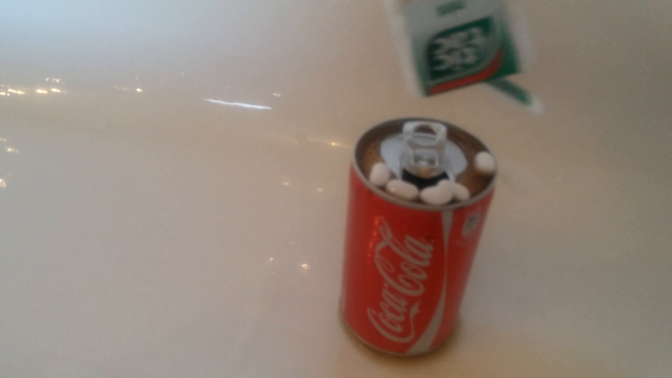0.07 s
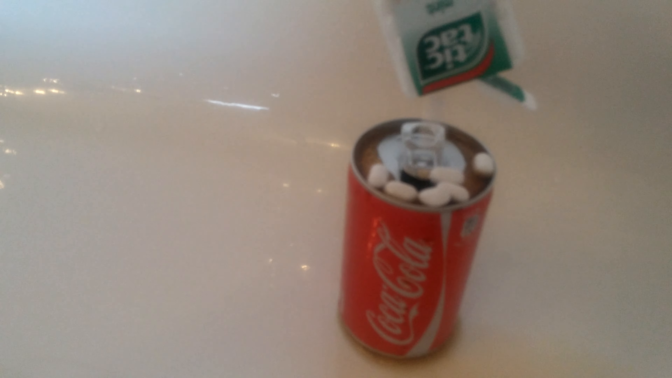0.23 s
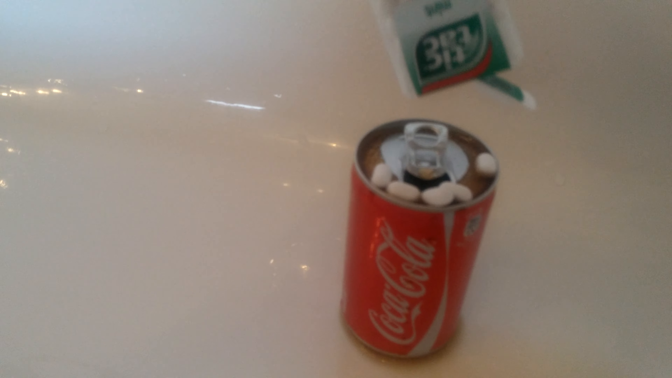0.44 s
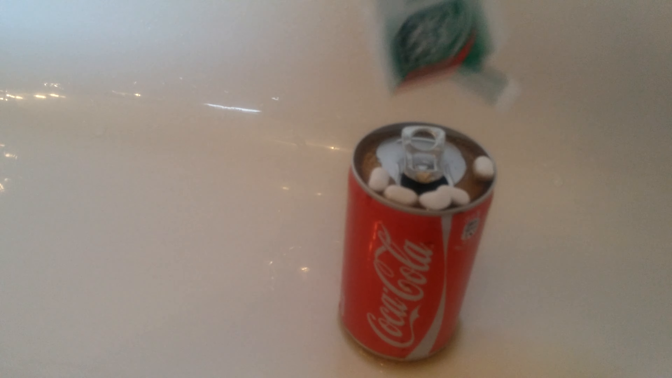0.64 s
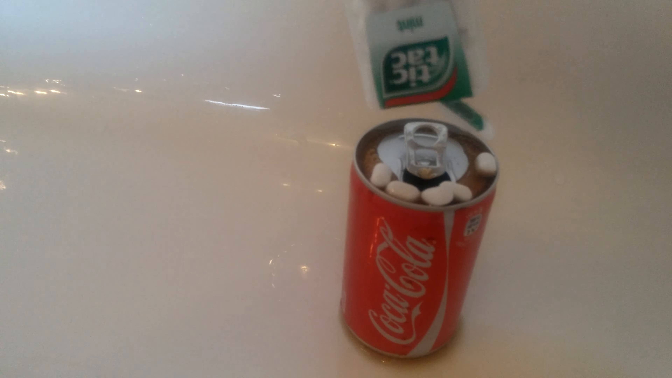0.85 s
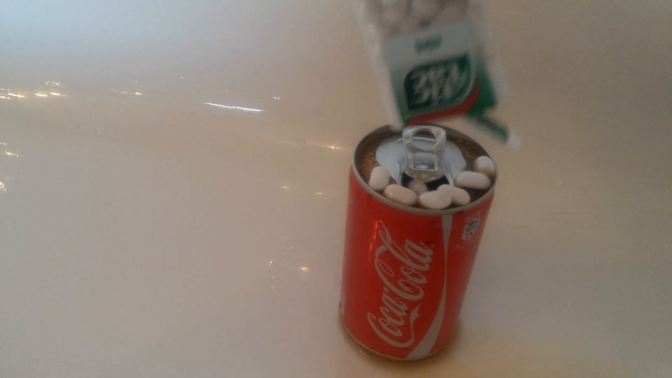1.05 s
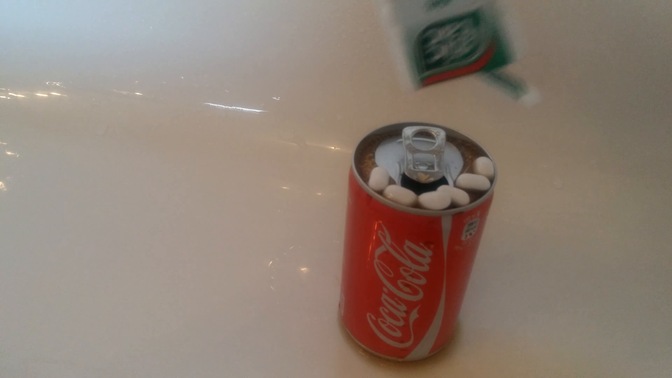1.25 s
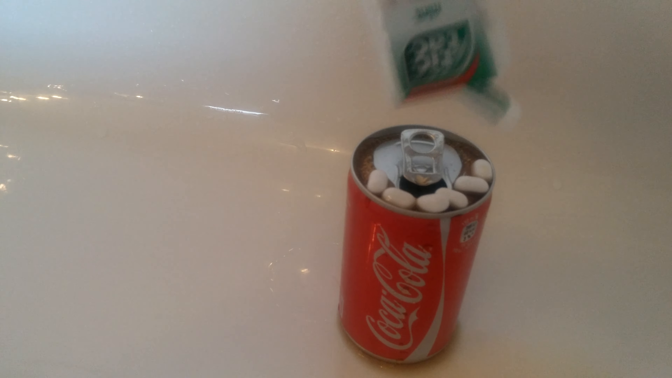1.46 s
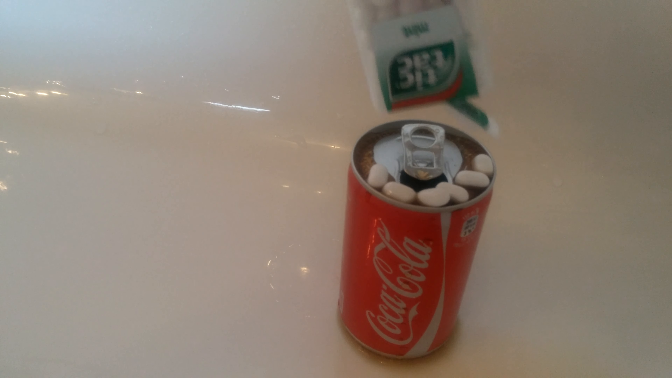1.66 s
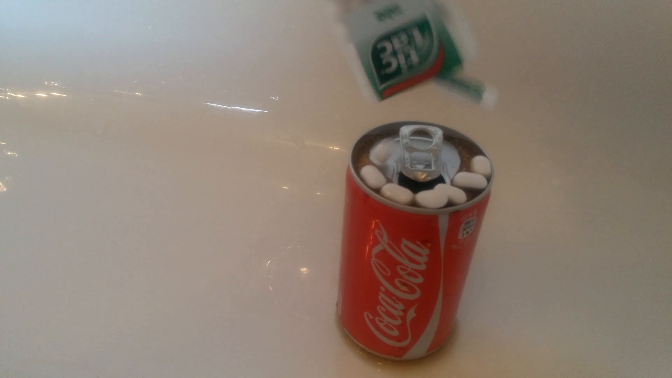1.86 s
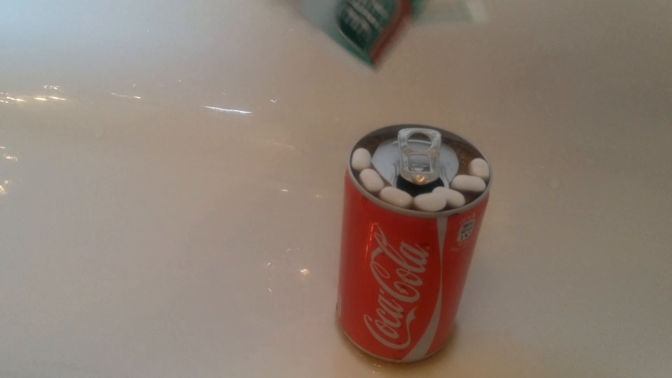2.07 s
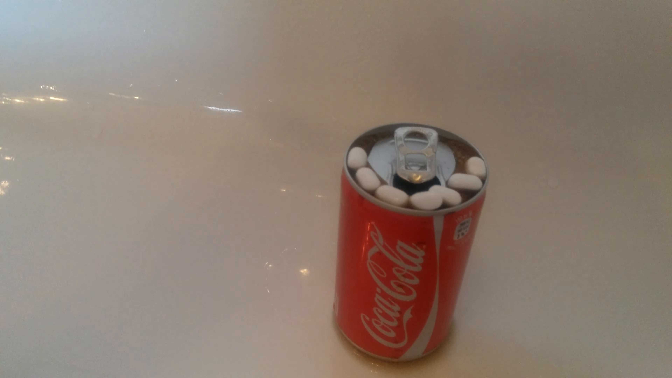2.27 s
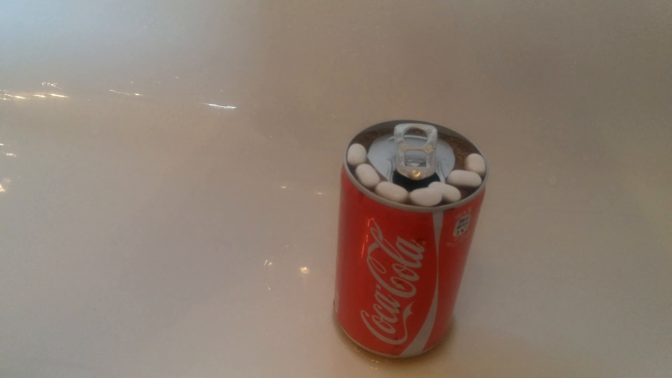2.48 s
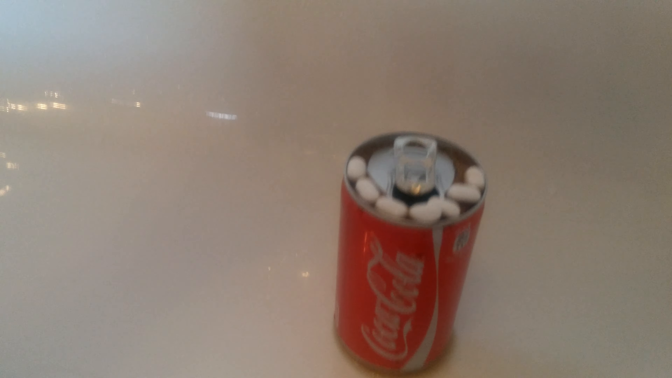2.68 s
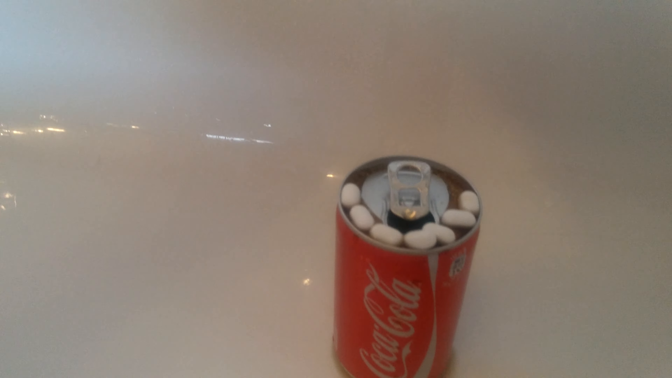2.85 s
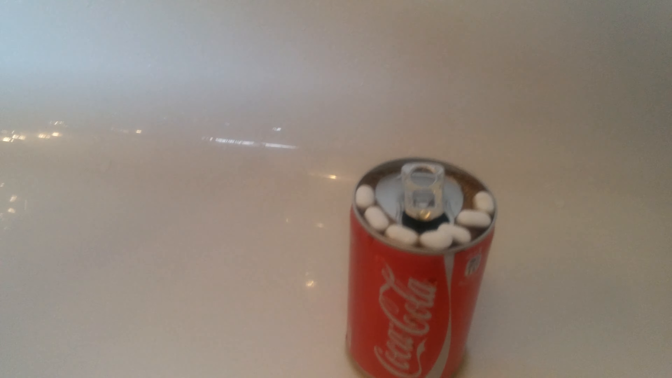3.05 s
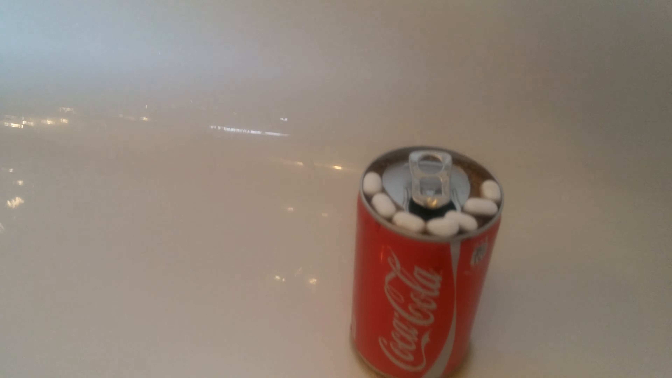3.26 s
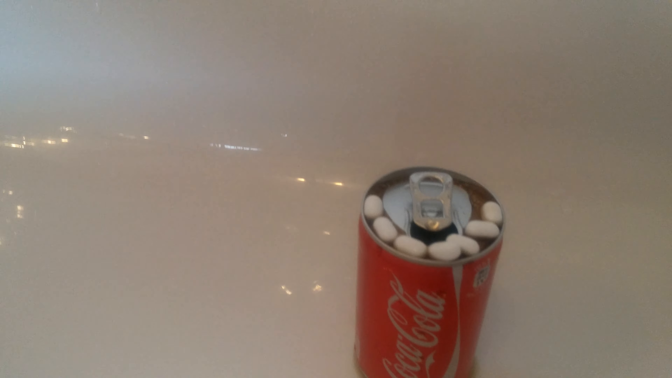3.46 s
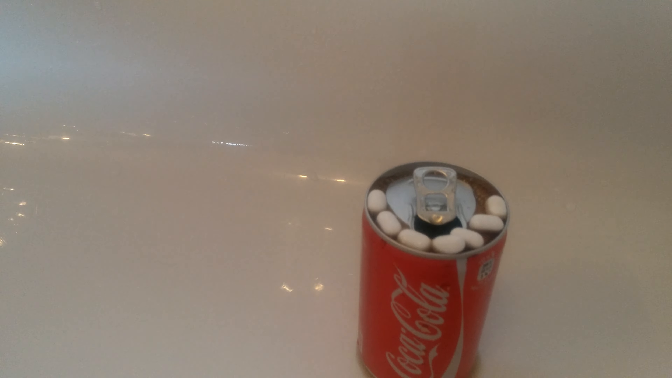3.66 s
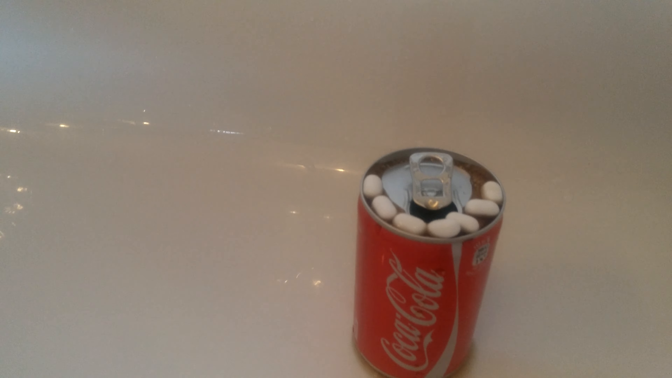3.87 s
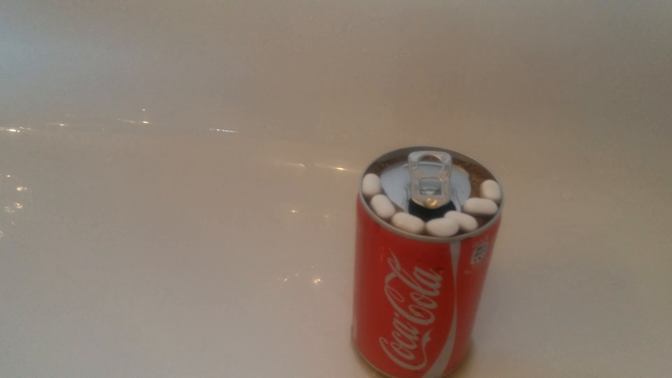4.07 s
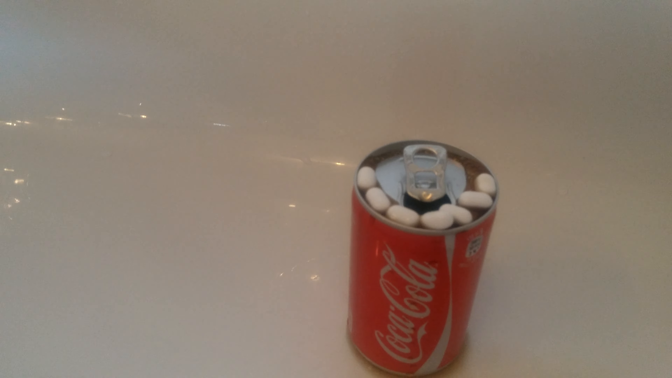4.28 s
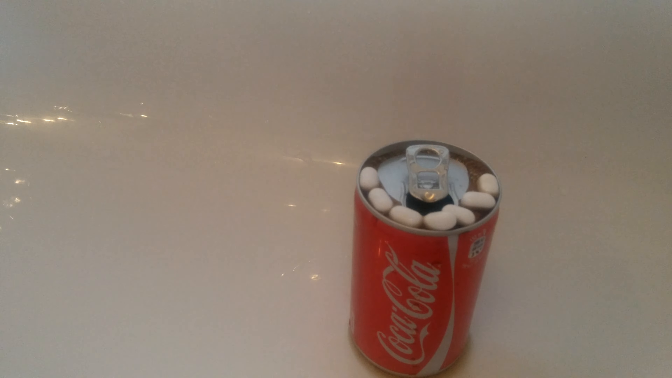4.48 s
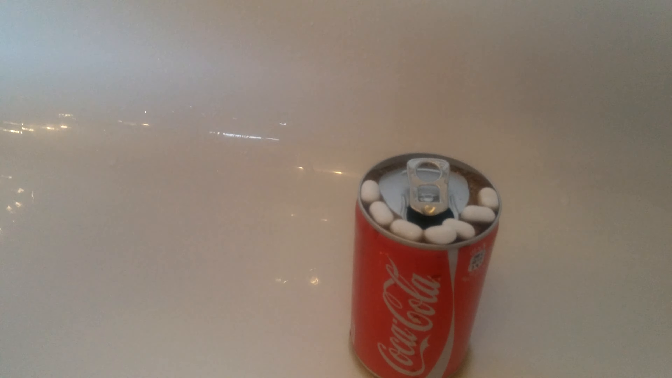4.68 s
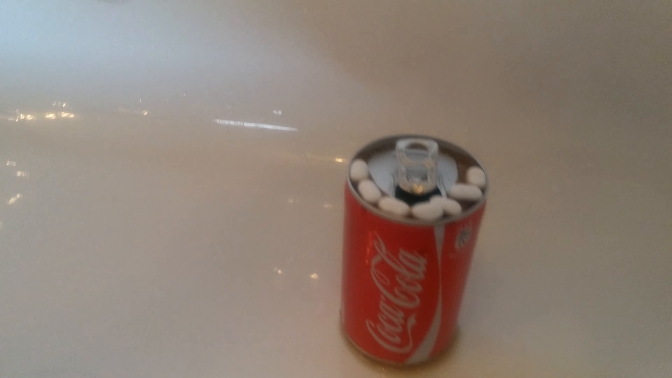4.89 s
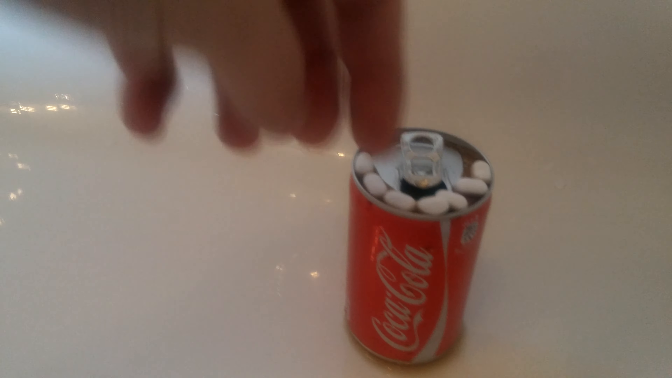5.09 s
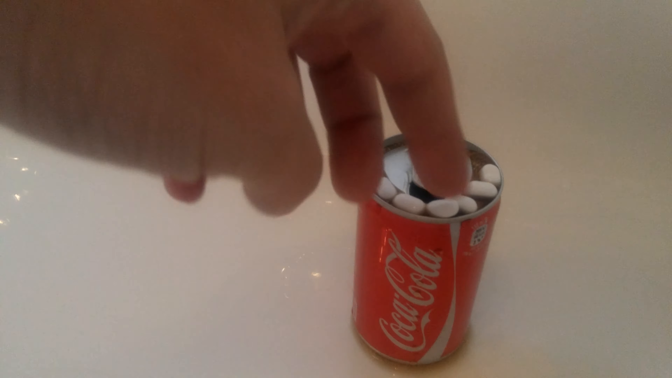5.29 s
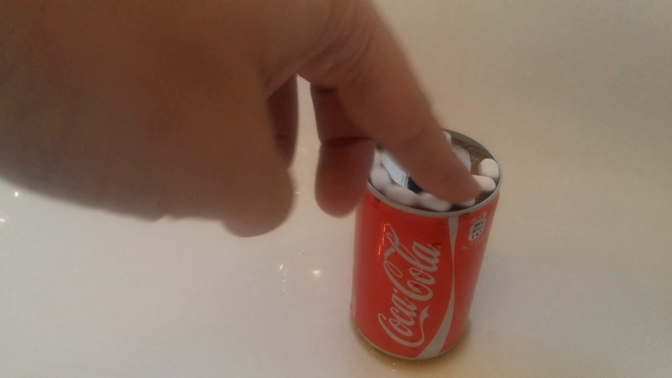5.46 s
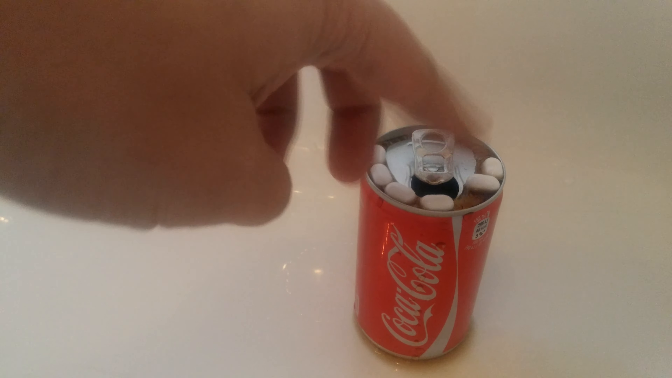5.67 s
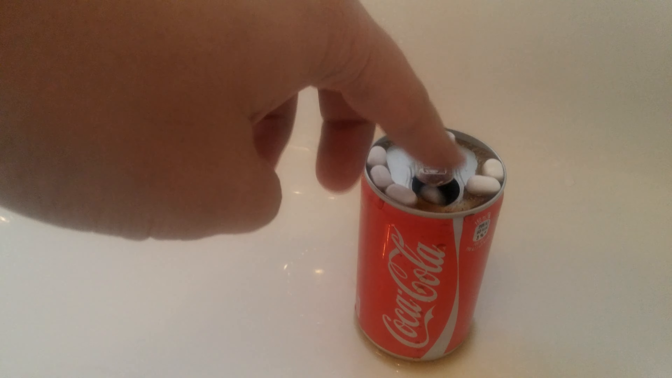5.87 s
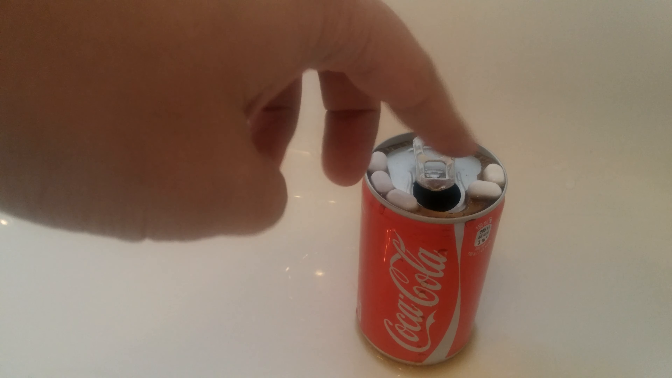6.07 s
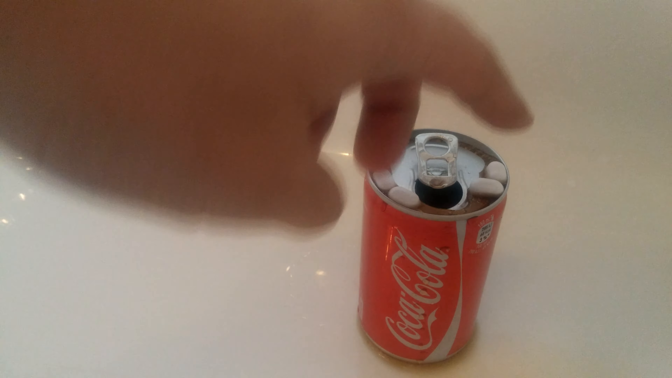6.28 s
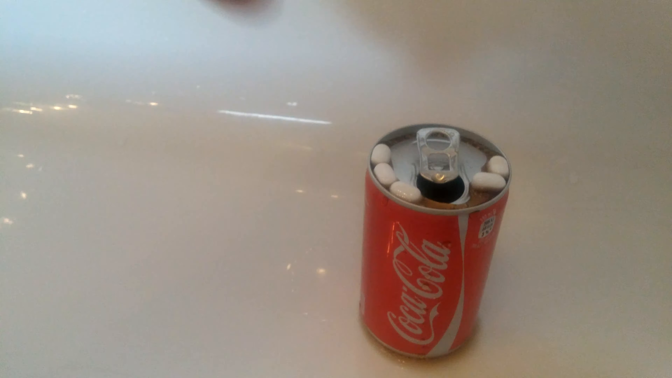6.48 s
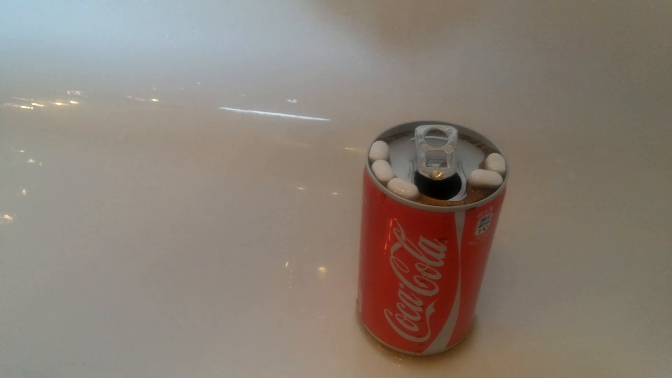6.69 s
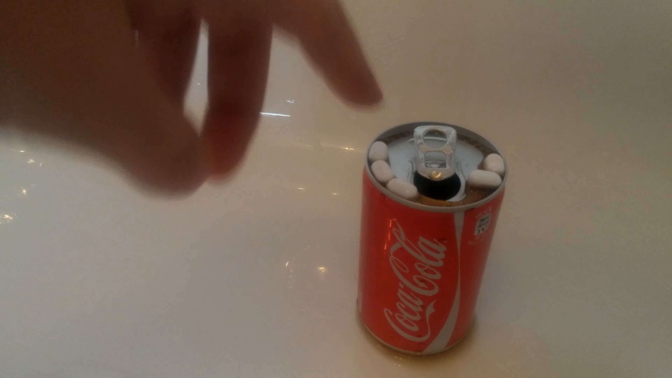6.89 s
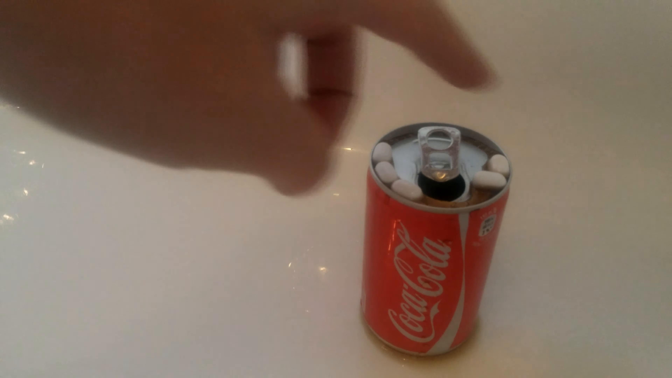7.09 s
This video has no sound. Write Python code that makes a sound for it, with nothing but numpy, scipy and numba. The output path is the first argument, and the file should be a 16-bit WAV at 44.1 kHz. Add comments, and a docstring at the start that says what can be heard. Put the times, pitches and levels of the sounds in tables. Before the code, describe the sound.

Dense plasticky rattling comes in uneven shakes, slightly to the right, with crisp ticks and short hollow rings as candies land on a metal can. Soft low thuds sit underneath. The box moves away, sounding more echoey, and stops. After two small pressure pops on the left, quiet dry clicks and tiny scrapes follow as mints are nudged on the lid, in a reverberant bare room with light hiss.

```python
"""Small bare room, a two-port recorder near the sources, faint hiss throughout and soft low thuds now and then.
From the start a plastic box of small hard mints is shaken: dense contacts wake short modes of its walls.
From 0.3 s some mints fall: they tick and bounce on a can and a hollow hard surface, which rings in a few modes.
The box moves aside and the rattle ends by about 4.5 s; two pressure pops hit the left port at 4.7 and 5.3 s.
From 5.8 s a finger nudges the mints on the thin metal lid: dry clicks, short rings and a faint scrape."""
import sys
import numpy as np
from numba import njit
from scipy import signal
from scipy.fft import rfft, irfft, next_fast_len
from scipy.io import wavfile
from scipy.ndimage import uniform_filter1d

SR = 44100
rng = np.random.default_rng(int(sys.argv[2]) if len(sys.argv) > 2 else 0)


def waveform_to_disk(signal):
    """Save audio, clipped to [-1, 1], as 16-bit WAV at the path in sys.argv[1]."""
    frames = np.transpose(np.atleast_2d(signal))
    scaled = np.clip(frames, -1, 1) * 32767
    samples = np.round(scaled).astype(np.int16)
    wavfile.write(sys.argv[1], SR, samples)


N = 314856
# All table levels are relative: each layer adds its own gain. Outputs have two rows: left port, right port.
PATH_HOLDS_S = 0.03  # the sources move, so the way to the walls changes this often


def undb(db):
    """Gain of a level in dB."""
    return 10 ** (np.asarray(db) / 20)


def band(x, lo_hz, hi_hz):
    """Second-order band-pass."""
    return signal.sosfilt(signal.butter(2, [lo_hz, min(hi_hz, 0.49 * SR)], "band", fs=SR, output="sos"), x)


def highpass(x, order, hz):
    """Butterworth high-pass."""
    return signal.sosfilt(signal.butter(order, hz, "high", fs=SR, output="sos"), x)


@njit(fastmath=True)
def add(out, at, pole, size, rise):
    """Adds one swelling and dying oscillation per row, until it has fallen 45 dB."""
    for k in range(len(at)):
        z, held = size[k], 1.
        for i in range(at[k], min(len(out), at[k] + int(-5.2 / np.log(abs(pole[k]))))):
            held = held * rise + 1e-12
            out[i] += z.imag * (1 - held)
            z *= pole[k]


FAVOUR_DB_PER_OCTAVE = 6  # a landing mint sounds mostly the modes near its colour


def ring(s, db, pan_db, modes, scatter_db, apart_db, detune, lead_ms=0., touch_s=0.000085, scale=0.96,
         count=1, spread_s=0., fall_db=0., colour_hz=None):
    """Each blow is `count` contacts in quick succession; each wakes the modes in a new mix and tuning."""
    gaps = rng.exponential(size=(len(s), count)) * (np.arange(count) > 0)
    late = spread_s * np.cumsum(gaps, axis=1)
    contact_s = (s[:, None] + late).ravel()
    base_db = (db[:, None] - fall_db * np.arange(count)).ravel()
    side_db, lead_s, scale = (np.repeat(v + 0 * s, count) for v in (pan_db / 2, lead_ms / 1000, scale))
    out = np.zeros((2, N))
    for hz, mode_db, t60 in modes:
        mix = rng.standard_normal((len(base_db), 5)).T
        if colour_hz is not None:
            octaves_off = np.abs(np.log2(hz / np.repeat(colour_hz, count)))
            mode_db = mode_db - FAVOUR_DB_PER_OCTAVE * octaves_off
        hz = hz * scale * (1 + detune * mix[4])
        pole = np.exp(2j * np.pi * hz / SR - np.log(1000) / (t60 * SR))
        for ch, sign in enumerate((1, -1)):
            # each port sees another face of the object: own level and, for short waves, own phase
            turn = np.exp(1j * sign * mix[2] * np.minimum(hz / 4500.0, 1.5))
            port_db = sign * (side_db + apart_db * mix[1])
            size = undb(base_db + mode_db + scatter_db * mix[0] + port_db)
            at = ((contact_s + ch * lead_s) * SR).astype(np.int64)
            add(out[ch], at, pole, size * turn * np.sign(mix[3]), np.exp(-1 / (touch_s * SR)))
    return out


def crack(s, db, pan_db, lo_hz, hi_hz, t60):
    """A short burst of noise at each contact, swelling for about a millisecond."""
    gate = np.full((2, N), 1e-18)
    gate[:, (s * SR).astype(int)] = undb(db + np.array([pan_db, -pan_db]) / 2)
    gate = signal.lfilter([1], [1, -np.exp(-np.log(1000) / (t60 * SR))], gate)
    gate = uniform_filter1d(gate, size=60, origin=29)
    return band(gate * rng.standard_normal((2, N)), lo_hz, hi_hz)


# where the box is heard: (time [s], left minus right level [dB], lead of the left port [ms])
PLACE = [(0, -6, 0), (1.2, -7, 0.17), (2.198, -4, 0.032), (2.752, -4, 0.094), (3.25, -2.5, 0.19),
         (3.75, -3, 0.32), (4.5, -2.5, 0.31)]


def place(s):
    """Level difference and lead between the ports at the given times."""
    when, pan_db, lead_ms = np.transpose(PLACE)
    return np.interp(s, when, pan_db), np.interp(s, when, lead_ms)


# spectrum of room air and capsule noise: (frequency [Hz], relative level per Hz [dB])
HISS = [(15, -45.5), (30, -12), (154, -4), (187, -12.5), (321, -6), (378, -13.5), (669, -7.5), (854, -10.5),
        (1600, -9.5), (2330, -14), (2980, -14.5), (6210, -18.5), (9330, -27.5), (15200, -33.5),
        (16500, -47.5)]
HISS_DB = -63  # RMS of the mean of both ports
# narrow bands in the hiss: (frequency [Hz], width [Hz], level at start [dB], level at end [dB])
WHIR = [(685, 30, -55, -76), (772, 100, -81, -68), (3110, 140, -72, -78.5), (5200, 131, -85, -74.5)]


def hiss():
    """Steady room air and capsule noise; bass more alike in both ports; a few narrow bands waver in it."""
    size = 2 * next_fast_len(N // 2 + 1)
    f = np.arange(size // 2 + 1) * SR / size + 1
    hz, db = np.transpose(HISS)
    mid, side = rfft(rng.standard_normal((2, size)))
    difference = np.clip(f / 1110.0, 0.3, 1) * side * np.array([[1], [-1]])
    air = irfft(undb(np.interp(np.log(f), np.log(hz), db)) * (mid + difference))[:, :N]
    air = air * undb(HISS_DB) / np.std(air.mean(axis=0))
    for hz, width, start_db, end_db in WHIR:
        noise = rng.standard_normal(N) + 1.9 * rng.standard_normal((2, N))  # shared plus own noise
        narrow = band(noise, hz - width / 2, hz + width / 2)
        air = air + undb(np.linspace(start_db, end_db, N)) * narrow / np.std(narrow)
    return air


# reverberation of the bare room: (frequency [Hz], t60 [s])
ROOM = [(150, 0.93), (600, 0.83), (2000, 0.44), (5500, 0.39), (12000, 0.27)]


def room(x, db):
    """Bare walls: a noisy tail that dies faster in the treble, another one for each port."""
    t = np.arange(30000) / SR
    hz, t60 = np.transpose(ROOM)
    tail = 0
    for f in 63 * 2 ** np.arange(0, 8.1, 0.5):  # half-octave bands
        decay = np.exp(-np.log(1000) * t / np.interp(np.log(f), np.log(hz), t60))
        mid, side = rng.standard_normal((2, len(t)))
        # long waves reach both ports more alike
        noise = mid + min(0.16 + f / 1600.0, 1) * side * np.array([[1], [-1]])
        tail = tail + decay * band(noise, f / 2 ** 0.25, f * 2 ** 0.25)
    tail = tail * (1 - np.exp(-t / 0.011))  # gradual build-up
    tail = tail / np.sqrt(np.sum(tail ** 2, axis=1, keepdims=True))
    return undb(db) * signal.fftconvolve(x.mean(axis=0, keepdims=True), tail, axes=1)[:, :N]


# first returns from hard walls: (delay [ms], level [dB])
ECHOES = [(15.5, -11), (20.5, -26), (31.8, -10.5), (47, -19)]
SMEAR_S = 0.00035  # decay time constant of each return


def echoes(x):
    """Hard walls return the treble, each return smeared by the rough path, differently at each port."""
    t = np.arange(3000) / SR
    shape = 0
    for ms, db in ECHOES:
        after = t - ms / 1000
        smear = (after > 0) * np.exp(-np.abs(after) / SMEAR_S)
        shape = shape + undb(db) * smear / np.sqrt(SMEAR_S / 2 * SR)
    hop = int(PATH_HOLDS_S * SR)
    out = np.zeros((2, N + len(t)))
    for at in range(0, N, hop):
        path = shape * rng.standard_normal((2, len(t)))
        back = signal.fftconvolve(x[:, at:at + hop].mean(axis=0, keepdims=True), path, axes=1)
        out[:, at:at + back.shape[1]] += back
    return band(out[:, :N], 870.0, 16000.0)


# soft low thuds in the room: (time [s], level [dB])
THUDS = [(0.279, -33.5), (0.482, -29.5), (0.61, -31.5), (0.8, -32), (0.967, -38.5), (1.118, -38.5),
         (1.379, -40.5), (2.187, -38), (3.274, -36.5), (4.176, -39.5), (4.4, -49.5), (4.824, -55),
         (5.348, -53), (5.854, -50.5), (6.784, -38.5)]
# low modes of the floor: (nominal frequency [Hz], level [dB], t60 [s])
FLOORBOARDS = [(111, -14, 0.2), (156, -9.5, 0.098), (225, -3.5, 0.05), (330, -2.5, 0.04)]


def thuds():
    """Each thud wakes the low floor modes, then rumbles on as a falling run of contacts."""
    s, db = np.transpose(THUDS)
    out = ring(s, db - 0.5, 1.7, FLOORBOARDS, 1.5, 1.2, 0.036, touch_s=0.0025)
    return out + ring(s + 0.012, db - 6.5, 1.4, FLOORBOARDS, 2., 1.8, 0.07, touch_s=0.002,
                      count=14, spread_s=0.011, fall_db=1.2)


# pressure pops at the left port: (time [s], level [dB])
POPS = [(4.6738, -8.5), (5.3143, -17.5)]


def pops():
    """A sub-millisecond pressure push, which the capsule's bass cut swings back; the port rings faintly."""
    out = np.zeros(N)
    t = np.arange(400) / SR
    push = (t / 0.00039 * np.exp(1 - t / 0.0003)) ** 2
    port_ring = 0.51 * np.cos(2 * np.pi * 4000 * t - 1.3) * t / 0.0006 * np.exp(-t / 0.0003)
    for s, db in POPS:
        out[int(s * SR):int(s * SR) + len(t)] = undb(db) * (push + port_ring)
    return highpass(out + 1e-18, 2, 80.) * undb([[0], [-26]])  # left port, right port


# finger nudges a mint on the lid:
# (time [s], level [dB], ring [Hz], click level [dB], left minus right level [dB], slide [s])
NUDGES = [(5.813, -39, 2170, -11, -6.5, .008), (5.851, -43, 1033, -7.5, -10, 0.029),
          (5.868, -48, 651, -16, -2, 0.019), (5.91, -53, 2180, -1, -2, .01),
          (6.018, -49, 745, -3.5, -8.5, .005), (6.129, -45.5, 780, -2, -4, 0.0035),
          (6.159, -46.5, 1005, -3.5, -5.5, 0.034), (6.314, -45.5, 777, -13, -2, .006),
          (6.442, -49.5, 1785, 3.5, -8, 0.012), (6.547, -47.5, 1830, 4, -3.5, 0.012)]
# lid modes: (multiple of the nudge's ring, level [dB], t60 [s])
LID = [(1, -2, 0.024), (1.2, -4, 0.018), (1.6, -11, .005), (2.9, -9, 0.008)]
# bright lid modes: (nominal frequency [Hz], level [dB], t60 [s])
LID_HIGH = [(2890, 12.5, 0.0038), (4220, -3, 0.008), (5260, -11, 0.0038)]


def finger():
    """Mints slide a little: a dry click, a ring of the thin metal lid and a faint scrape."""
    s, db, hz, click_db, pan_db, slide_s = np.transpose(NUDGES)
    slide_s = slide_s[:, None]
    out = ring(s, db, pan_db, LID, 2.5, 2, 0.02, touch_s=0.001, scale=hz,
               count=6, spread_s=slide_s / 5, fall_db=1)
    out += ring(s, db + click_db - 7.5, pan_db, LID_HIGH, 1.25, 5.8, 0.078,
                count=4, spread_s=slide_s / 3, fall_db=3.0)
    click = crack(s, db + click_db + 8, pan_db, 500., 5000., 0.02)
    scrape = crack(s, db - 10.5, pan_db, 530.0, 7000.0, 0.21)
    return out + click + scrape


# landings on the hollow surface:
# (time [s], level [dB], lowest mode [dB], second mode [dB], bright modes [dB])
LANDINGS = [(0.272, -35, -24, -11, -10), (0.379, -36, -13, -8, -6), (0.472, -49, -6, -6, 1),
            (0.498, -33, -24, 0, -21), (0.619, -31.5, -14, -19, -15), (0.792, -50, 6.5, 1, -13),
            (0.829, -51, 0, -1, -9), (0.964, -52, -7, -12, -33), (1.29, -29.5, -7.5, -11.5, -6),
            (1.351, -26, -12, -14, -9.5), (1.363, -46, -7, 0, -14), (1.395, -36, -4.5, -13, -3),
            (2.181, -33.5, -14, -3, -2.5), (2.194, -40.5, -8, -23, 8.5), (2.237, -44, -22, -16, 5.5),
            (2.25, -50, -9, -25, 6), (5.858, -57.5, 9.5, -2, -9)]
# modes of the hollow surface: (frequency [Hz], level [dB], t60 [s])
SURFACE = [(254, -8, 0.4), (318, -6, 0.8), (566, -5, 0.09), (588, 2, 0.14), (1090, -8, 0.25),
           (1863, -3, .1), (2153, -12, .1), (2492, -12, .12), (2590, -5, 0.45), (2700, -5, .15),
           (3050, -1, .09), (3200, -5, .08)]


def surface():
    """The hollow surface rings in a few modes, mixed by where the mint lands."""
    s, db, lowest_db, second_db, bright_db = np.transpose(LANDINGS)
    groups = SURFACE[:1], SURFACE[1:2], SURFACE[2:4], SURFACE[4:]
    out = np.zeros((2, N))
    for extra_db, modes in zip((lowest_db, second_db, 0, bright_db), groups):
        out += ring(s, db + extra_db, -1.3, modes, 1., 1.5, 0.003, touch_s=0.001, scale=1.)
    return out


# fallen mints tick on the can and the surface: (time [s], level [dB], body level [dB], colour [Hz])
TICKS = [(0.2703, -18.5, 6.5, 3600), (0.369, -33.5, 4.5, 4500.0), (0.378, -15, 6.5, 3300),
         (0.4178, -33, 3, 1600.0), (0.4737, -6.5, -3, 4000), (0.4945, -14, 1, 2580),
         (0.5492, -4, -4, 4440.0), (0.6135, -18.5, 2.5, 3900), (0.6686, -6, -3, 3800),
         (0.7008, -3, -8.5, 4780.0), (0.794, -15.5, 1, 4460), (0.809, -26, -13, 4300.0),
         (0.8253, -8, -4, 4900), (0.8428, -19.5, -8.5, 4200), (0.8715, -14, 2.5, 5460),
         (0.8927, -19, -17, 4890.0), (0.9678, -15, -0.5, 4630), (0.9826, -26.5, -30, 3670),
         (1.021, -18, -2.5, 4060), (1.036, -36, 6, 1750.0), (1.1094, -18.5, -3, 2510),
         (1.1583, -20.5, 2.5, 3240.0), (1.2887, -15, 4, 3140), (1.3467, -14, 3, 4070),
         (2.18, -19, 3.5, 3100), (2.194, -20.5, 0.5, 2970), (2.237, -43, -3, 2530),
         (2.2472, -27.5, 4, 3050.0), (2.5081, -24, -28, 3160.0)]
# bright modes of a mint's contact: (nominal frequency [Hz], level [dB], t60 [s])
MINT = [(6900, -8, 0.004), (8115, -7, 0.004), (9360, -1, 0.005), (10300, -4, 0.005), (12200, -17, .005),
        (13400, -16, .005), (15500, -14, .005)]
# lower modes, the body of the tick: (nominal frequency [Hz], level [dB], t60 [s])
MINT_BODY = [(1488, 0, 0.005), (1900, -2, .005), (2387, 0, 0.009), (3150, 1, 0.009), (3800, -6, .004),
             (4400, 0, 0.008), (5070, -2, 0.006), (5800, 0, 0.005)]
SHELL_DB, SHELL_BODY_DB, SHELL_COLOUR_HZ = -9.5, 7, 4500  # the tick within each knock of the box


def ticks():
    """Sharp bright contacts of sugar shells on hard things, also in each knock; brightest at the right port."""
    knock_s, knock_db, bright_db, _ = np.transpose(KNOCKS)
    same = np.ones(len(knock_s))
    shells = np.transpose([knock_s, knock_db + bright_db + SHELL_DB,
                           SHELL_BODY_DB * same, SHELL_COLOUR_HZ * same])
    s, db, body_db, colour_hz = np.vstack([TICKS, shells]).T
    pan_db, lead_ms = place(s)
    out = ring(s, db - 10.0, pan_db - 12.5, MINT, 2.1, 1.6, 0.031, lead_ms,
               count=4, spread_s=0.0012, fall_db=2.0)
    out += ring(s, db + body_db - 10, pan_db + 4.0, MINT_BODY, 4.5, 4.1, 0.055, lead_ms,
                count=4, spread_s=0.0016, fall_db=0.8, colour_hz=colour_hz)
    out += crack(s, db - 5.5, pan_db - 3, 4300.0, 11000.0, 0.024)
    out += crack(s, db + body_db - 15.5, pan_db, 1000.0, 6500., 0.045)
    return highpass(out, 2, 400.)


# jolts of the hand that set the heap tumbling: (start [s], length [s], level [dB], brightness [dB])
SHAKES = [(0.019, 0.14, -24, -1), (0.196, 0.13, -31.5, 4), (0.466, 0.23, -54, -8), (1, 0.049, -37.5, -13),
          (1.168, 0.044, -21, 4.5), (1.276, 0.024, -39.5, -1), (1.722, 0.023, -30.5, -10),
          (1.8, 0.18, -28.5, 1), (2.505, 0.12, -32, 6), (2.583, 0.2, -27, 3), (2.94, 0.24, -31, 5),
          (3.243, 0.034, -27, -1.5), (3.617, 0.024, -39, -25), (3.735, 0.063, -41.5, -15),
          (3.876, 0.17, -35, 0), (4.168, 0.13, -34.5, -10)]
STIR_DB_PER_S, SETTLE_DB_PER_S = 698, 228  # how fast the heap starts and comes to rest


def heap(s):
    """Level and brightness of the tumbling: each jolt stirs, holds and settles; the strongest rules."""
    start, length, db, bright_db = np.transpose(SHAKES)
    since = s[:, None] - start
    stir_db = STIR_DB_PER_S * np.maximum(-since, 0)
    settle_db = SETTLE_DB_PER_S * np.maximum(since - length, 0)
    now_db = db - stir_db - settle_db
    return now_db.max(axis=1), bright_db[now_db.argmax(axis=1)]


# the loudest throws of mints against the box wall; grip and heap move its ring:
# (time [s], level [dB], brightness [dB], ring [Hz])
KNOCKS = [(0.0231, -28, -5, 1430), (0.035, -22.0, -3, 1470), (0.0467, -20, -2, 1330),
          (0.0593, -18, -5, 1250), (0.075, -19.5, -1, 1390), (0.0839, -14.5, -2, 1540),
          (0.0962, -14.5, 0, 1555), (0.1098, -10, -4, 1346), (0.1219, -17, -2, 1500), (0.145, -21, 6, 1400),
          (0.1656, -18, -3.5, 1270), (0.218, -14, -8, 1320), (0.2285, -27.5, 7.5, 1620),
          (0.239, -28, 3, 1350), (0.2523, -22.5, -24, 1340), (0.2807, -19.5, -14, 1255),
          (0.2877, -23, -20, 1430), (0.2937, -30, -12, 1540), (0.302, -30, -11, 1452),
          (0.3184, -35.5, 11.5, 1310), (0.393, -13.5, -24, 1317), (0.511, -18, -19, 1470),
          (0.526, -31, -15, 1570), (0.5616, -28, -10, 1700), (0.5706, -33, 2, 1540),
          (0.627, -20.5, -15, 1800), (0.6925, -21, -19, 1810), (0.7178, -23, -2, 1300),
          (0.735, -36, -2, 1640), (0.9077, -49, 2, 1770), (0.956, -36, -2, 1720.0),
          (1.0047, -22, -23, 1320), (1.047, -22.5, -10, 1320.0), (1.115, -16, -7, 1476),
          (1.13, -19.5, -4, 1350), (1.18, -15.5, -5, 1440), (1.188, -9, -8, 1350),
          (1.2063, -19, -3.5, 1320), (1.2265, -19, 2, 1370), (1.2405, -35, -8, 1570), (1.267, -26, 1, 1650),
          (1.2803, -20, -6, 1380), (1.305, -30, -19.5, 1470), (1.3158, -22, -15, 1345),
          (1.3585, -18, -23, 1190), (1.4928, -46, -3, 1370), (1.535, -47.5, 3, 1180.0),
          (1.631, -38, -10, 1390), (1.671, -29, -13, 1345), (1.681, -34, -2, 1350), (1.687, -33, -12, 1390),
          (1.7068, -22.5, -5, 1380), (1.724, -7, -8, 1470), (1.738, -15, -7, 1340),
          (1.7497, -14, -12.5, 1417), (1.7723, -18.5, -9, 1600), (1.7835, -14.5, -14, 1330.0),
          (1.7955, -22, -7, 1370), (1.8217, -25.5, -1, 1350), (1.8386, -12.5, -11, 1290),
          (1.8524, -11, -9, 1400), (1.8628, -16, -17, 1360), (1.8712, -25, 2.5, 1440),
          (1.8985, -17.5, -8, 1310), (1.9113, -16.5, -19, 1330), (1.9232, -12.5, -13, 1280),
          (1.94, -16.5, -11, 1434), (1.9806, -13.5, -8.5, 1345), (1.988, -19.5, -4.5, 1330),
          (2.083, -21.5, 1, 1290), (2.0978, -33, 1.5, 1500), (2.122, -26.5, -1, 1405),
          (2.4767, -30.5, -3, 1360), (2.487, -32, -8, 1340), (2.494, -27.5, -8, 1420),
          (2.523, -27, -5, 1420), (2.5343, -17.5, -5, 1270), (2.543, -22, -4, 1320),
          (2.5572, -23, -5, 1460), (2.605, -13.5, -7.5, 1470), (2.6131, -15.5, -10, 1385),
          (2.621, -16.5, -6, 1358), (2.643, -19.5, -2, 1500), (2.6537, -22, -5, 1460),
          (2.663, -20, -23, 1480), (2.6771, -25, -12, 1430), (2.6934, -32, -20.0, 1470),
          (2.7135, -24.5, 7, 1530), (2.7214, -20.5, -7.0, 1780), (2.741, -19.5, 1, 1310),
          (2.767, -14, 1, 1496), (2.7798, -16, 5, 1190), (2.7992, -14.5, -20, 1370),
          (2.8233, -20.5, 2.5, 1380), (2.846, -37, 5, 1570), (2.879, -40, 5, 1320), (2.913, -26, -7, 1410),
          (2.938, -20, -27, 1425), (2.9527, -24.5, -0.5, 1500), (2.9813, -22.5, -21, 1354),
          (2.989, -13, -8, 1460), (3.0247, -24, 8, 1170), (3.031, -18, -2, 1380), (3.041, -20.5, 8, 1500),
          (3.0523, -25, -7, 1417), (3.066, -35, -7, 1330), (3.075, -27, -11, 1300),
          (3.0963, -20.5, 5.5, 1300), (3.122, -21, -24, 1740), (3.1403, -27, -19, 1400),
          (3.2161, -14.5, -16.0, 1420), (3.2418, -28, 5.5, 1430), (3.264, -19.5, 5, 1500),
          (3.271, -16.5, -20, 1190), (3.2816, -21.5, -20, 1500), (3.2936, -26, 2, 1350),
          (3.3436, -36, -7, 1505), (3.3575, -23, -14, 1510), (3.3683, -37, -9, 1360.0),
          (3.4058, -48, -11, 1550), (3.4662, -34, -20, 1470), (3.481, -37.5, -13.5, 1520),
          (3.5, -42, -15, 1450.0), (3.5159, -46.5, -9.5, 1440.0), (3.6148, -38, -14, 1404),
          (3.6224, -32.5, -8.5, 1180), (3.6367, -35.5, -24, 1370), (3.651, -47, -20, 1450),
          (3.6588, -38, -24, 1550), (3.7373, -43, -11, 1410.0), (3.755, -36, -7, 1260),
          (3.7752, -36.5, -9, 1420), (3.792, -35, -12, 1400), (3.8032, -39.5, -12, 1700),
          (3.8682, -28.5, -1, 1360), (3.8824, -9, -36, 1425), (3.9, -16, -34, 1370),
          (3.9128, -13.5, -11.5, 1480), (3.9335, -16.5, -9, 1460), (3.9468, -23, -9, 1430.0),
          (4.0048, -16.5, -11, 1490), (4.0182, -25, -8, 1480), (4.0373, -20.5, -25.5, 1450),
          (4.103, -22.5, -13.5, 1430), (4.1141, -23.5, -15, 1460), (4.183, -19, -7, 1660),
          (4.2094, -30.5, -4.5, 1530.0), (4.267, -25, -10, 1344), (4.2834, -25, -15, 1365),
          (4.3087, -39, -6, 1470), (4.3499, -40, -16.5, 1310), (4.3562, -35.5, -12.5, 1250.0),
          (4.429, -34, -17.5, 1370)]
# modes of the plastic box: (nominal frequency [Hz], level [dB], t60 [s])
BOX = [(703, -11.5, 0.0077), (910, -14.5, 0.014), (1290, -7.5, 0.0069), (1403, -7.5, 0.028),
       (1578, -11.5, 0.025), (1880, -10.5, 0.018)]
# bright modes of the box: (nominal frequency [Hz], level [dB], t60 [s])
BOX_HIGH = [(3142, -2.5, 0.021), (3720, -14.5, 0.059), (4130, -14, 0.029), (5220, -5, 0.023),
            (6030, -3.5, 0.019), (6880, -11, 0.02), (9240, -12, 0.016), (11600, -24, 0.025)]
BOX_RING_HZ = 1400  # the ring at which the box modes are listed
BOX_TOUCH_S = 0.0009  # time constant of a contact's onset
STRONG_DB, STRONGEST_DB = 2, 8  # spread of the small contacts towards strong ones, and its limit


def box():
    """Loud knocks of several mints over a dense tumble of small contacts; too small to radiate bass."""
    s, db, bright_db, hz = np.transpose(KNOCKS)
    pan_db, lead_ms = place(s)
    # a negative fall makes the later contacts of a knock louder
    out = ring(s, db, pan_db, BOX[:2], 0.7, 0.62, 0.051, lead_ms, touch_s=BOX_TOUCH_S,
               count=2, spread_s=0.0021)
    out += ring(s, db + 0.5, pan_db, BOX[2:], 2.0, 0.61, 0.036, lead_ms, touch_s=BOX_TOUCH_S,
                scale=hz / BOX_RING_HZ, count=2, spread_s=0.001349, fall_db=-2.0)
    out += ring(s, db + bright_db - 19.5, pan_db + 4.0, BOX_HIGH, 3.6, 0.55, 0.014, lead_ms,
                touch_s=0.0004, count=4, spread_s=0.002, fall_db=-2.5)
    # the tumble: 2400 contacts spread over 4.6 s, many faint and few strong
    chance = rng.random((2400, 2)).T
    s = chance[0] * 4.6
    db, bright_db = heap(s)
    pan_db, lead_ms = place(s)
    db = db - 2.0 + np.minimum(-STRONG_DB * np.log(1 - chance[1]), STRONGEST_DB)
    out += ring(s, db, pan_db, BOX, 3.63, 2.6, 0.05, lead_ms, touch_s=BOX_TOUCH_S)
    out += ring(s, db + bright_db - 21.0, pan_db + 0.5, BOX_HIGH, 2.2, 7.4, 0.035, lead_ms)
    out += ring(s, db + bright_db - 27.0, pan_db - 21, MINT, 2.1, 3.2, 0.032, lead_ms)
    return highpass(out + 1e-18, 4, 600.)


BOX_SEND_DB, SURFACE_SEND_DB = -11, -10.5  # into echoes and room; into the room only


def scene():
    """Near sources, their echoes and room sound, the pops and the hiss."""
    shaken, dropped, rung, nudged = box(), ticks(), surface() + thuds(), finger()
    # the hand shades box and lid from the walls; the further aside the box goes, the wetter it sounds
    aside_db = 12 * place(np.arange(N) / SR)[1]
    sent = undb(BOX_SEND_DB + aside_db) * (shaken + nudged) + dropped
    # box and mints move, so successive moments meet different tails
    turn = np.arange(N) // int(PATH_HOLDS_S * SR) % 3
    tails = sum(room(sent * (turn == k), -1.8) for k in range(3)) + room(rung, SURFACE_SEND_DB)
    near = shaken + dropped + rung + nudged
    return near + echoes(sent) + tails * undb([[-1.5], [1.5]]) + pops() + hiss()


TOP_HZ = 16300  # upper edge of the recorder's pass band


def record(dry):
    """The recorder cuts the deep bass, rounds the loudest peaks and cuts the top."""
    rounded = 0.95 * np.tanh(highpass(dry, 2, 33.) / 0.95)
    return signal.sosfilt(signal.ellip(10, 0.2, 95, TOP_HZ, fs=SR, output="sos"), rounded)


dry = scene()
out = record(dry)
waveform_to_disk(out)
```